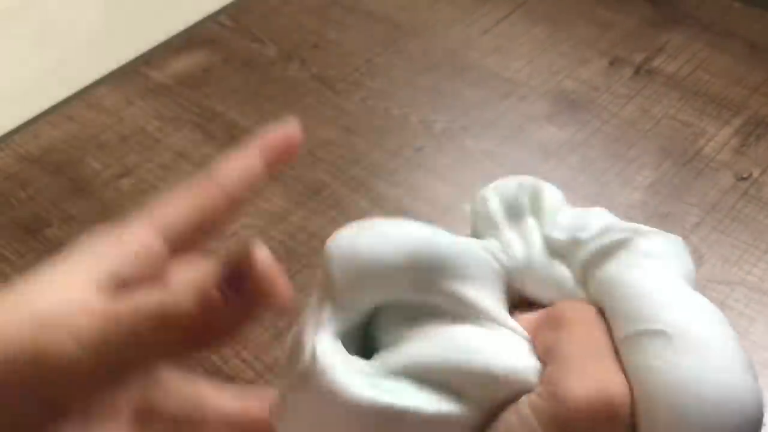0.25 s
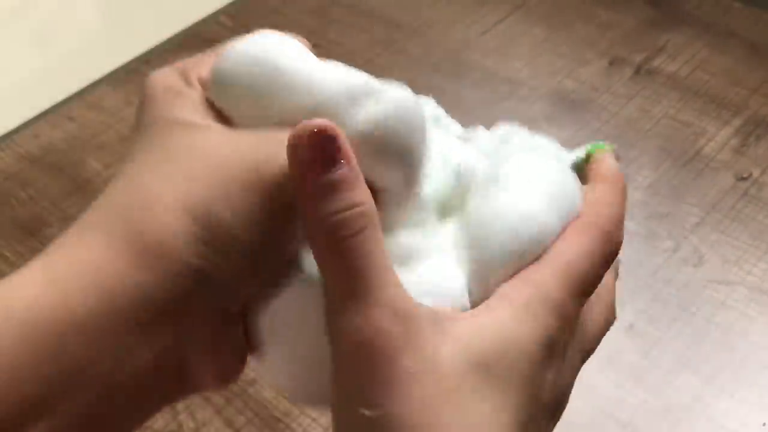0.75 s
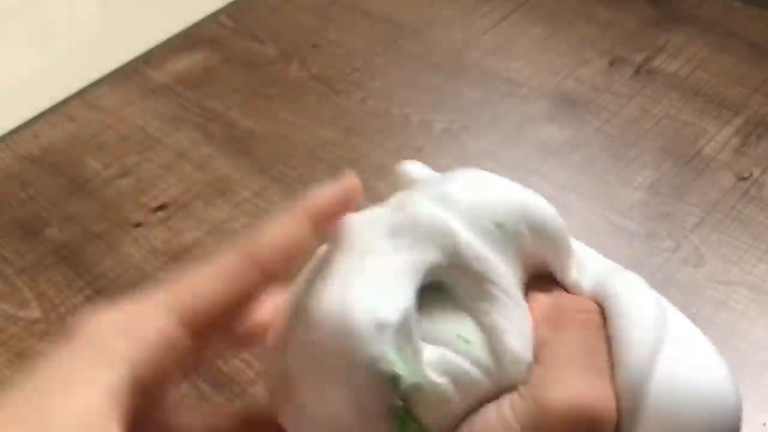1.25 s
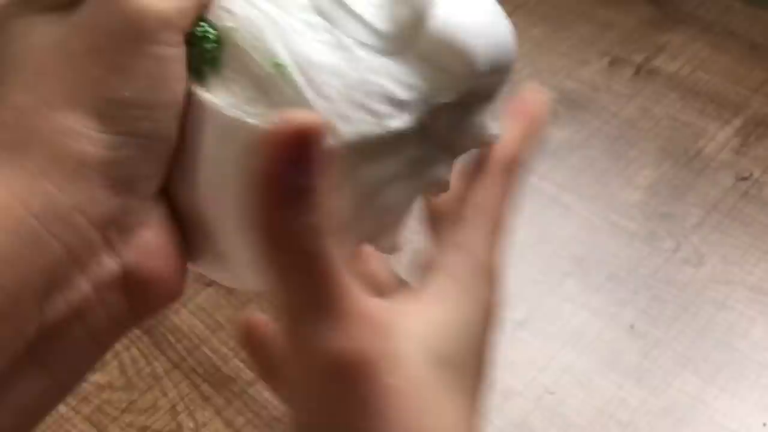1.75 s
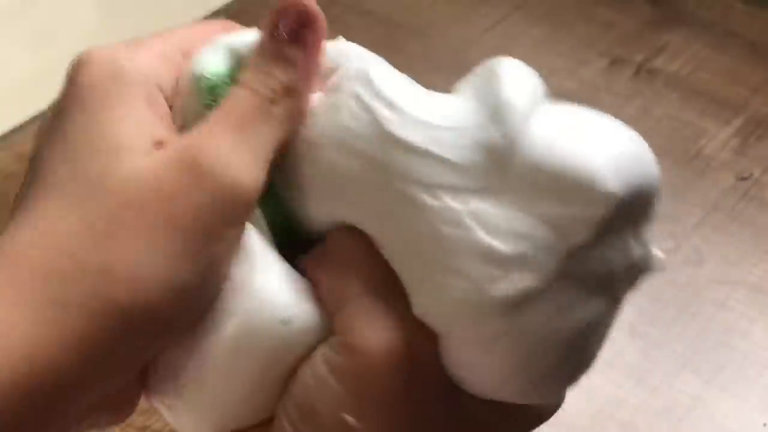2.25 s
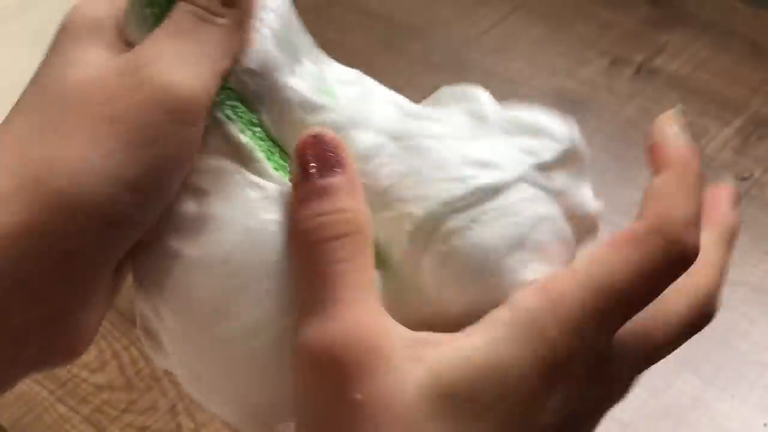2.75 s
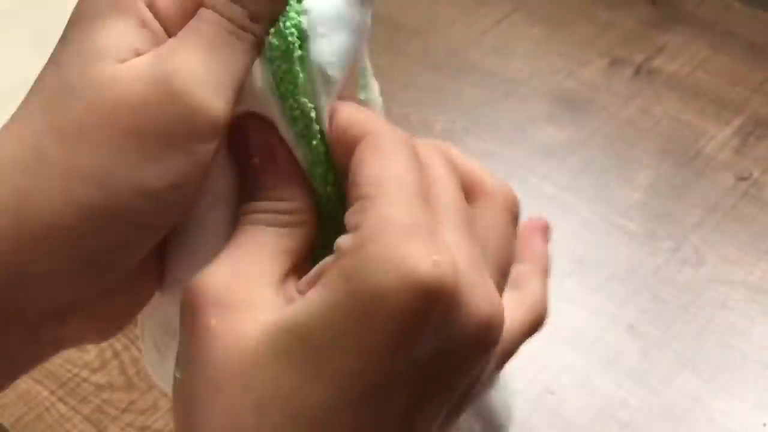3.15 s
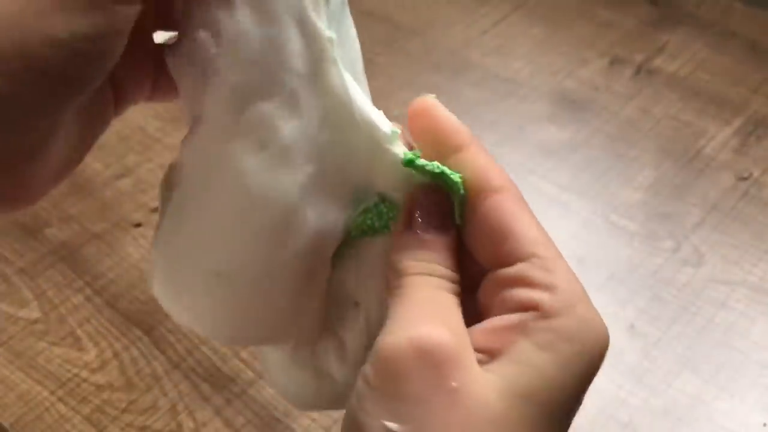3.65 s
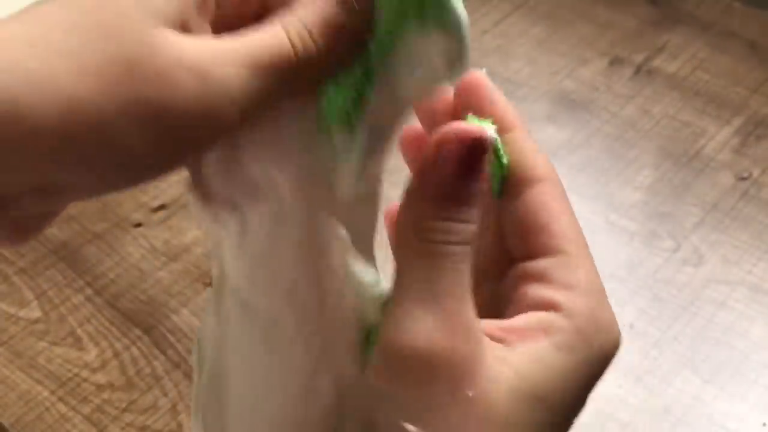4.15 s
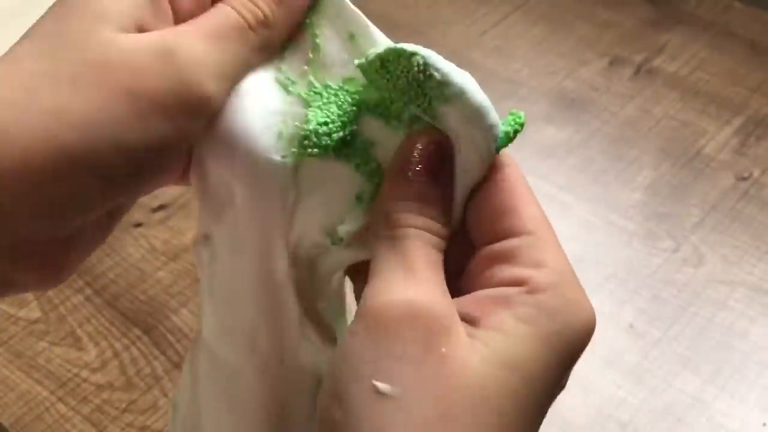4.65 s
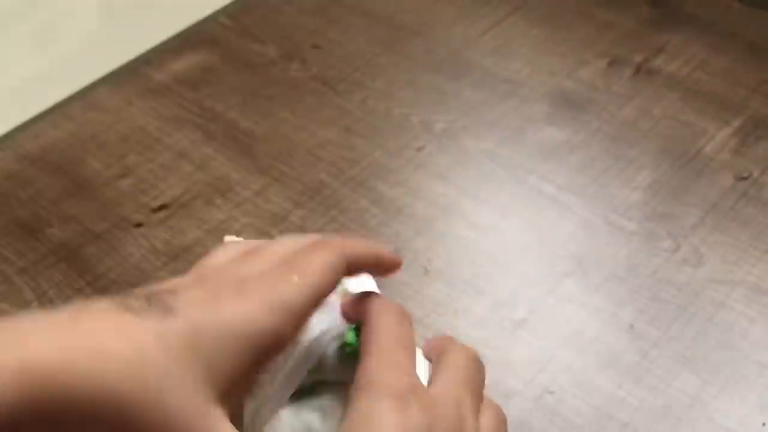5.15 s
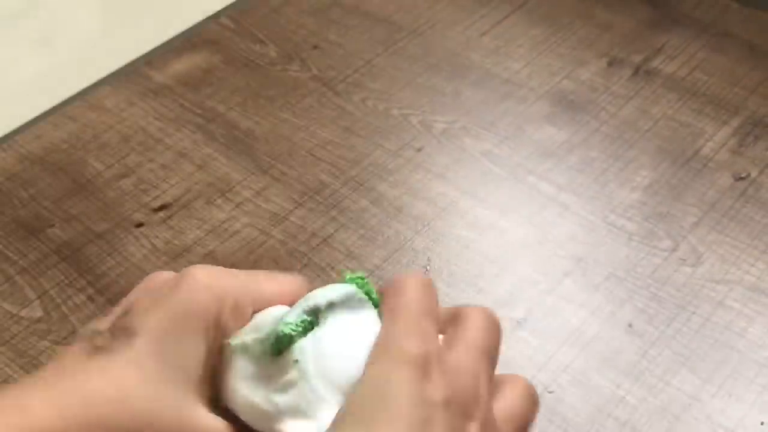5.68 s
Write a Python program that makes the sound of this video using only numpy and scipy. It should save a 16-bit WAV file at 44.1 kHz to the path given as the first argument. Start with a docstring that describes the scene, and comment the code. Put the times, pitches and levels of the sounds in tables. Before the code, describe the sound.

Squishy slime full of tiny bubbles is squeezed very near the microphone, indoors with a short dry echo. Irregular clicks, wet pops and bursts of crackle come in quick uneven groups, strongest at the start. Pulling the slime gives softer, continuous high fizzing and light ticks. A brief squeak, low plops, a sharp double snap and renewed crackling finish it. Weak hiss and low hum remain beneath.

```python
"""Hands knead soft slime close to a phone in a small quiet room; hiss and a wavering low hum run throughout.
It opens with loud film snaps, falling plops of collapsing air pockets and, at each squeeze, a dense crackle.
Halfway the lump is drawn into a sheet: a long rustle in the finest bubbles, under quieter snaps.
As the rustle ends a slit squeaks (noise in a moving resonance); more plops and two hard snaps close the scene.
Snaps and plops are short decaying swings; the crackle adds random ones over band-limited noise."""
import sys
import numpy as np
from scipy import signal
from scipy.fft import rfft, irfft
from scipy.io import wavfile

SR = 44100
rng = np.random.default_rng(int(sys.argv[2]) if len(sys.argv) > 2 else 0)


def transcribe(u):
    """Save the signal u as a 16-bit wav file named by the first command-line argument.

    u: samples, shape (n,) or (channels, n), limited to [-1, 1]; the rate is SR.
    q: integer samples, one column per channel.
    """
    v = np.clip(np.atleast_2d(u).T, -1, 1)
    q = np.round(v * 32767).astype(np.int16)
    wavfile.write(sys.argv[1], SR, q)


N = 261072

# Steady room and microphone noise, spectral shape: pitch_hz [Hz], density_db [dB per Hz, relative]
HISS_SHAPE = [(15, -45.5), (25, 21.5), (70, 14.5), (130, 19), (212, 15.5), (476, -20.5), (591, -24.5),
              (1190, 5), (13200, -54), (16000, 10.5)]
HISS_LEVEL_DB = -62.5  # rms
# Low hum in the room: start_s [s], level_db [dB rms]
HUM_LEVEL = [(0.0, -73), (1.2, -77), (1.34, -58.5), (1.98, -70), (2.37, -62), (2.49, -72.5), (3.12, -67),
             (3.13, -76), (3.71, -69.5), (3.84, -61.5), (4.01, -70.5), (4.78, -60.5), (4.83, -74.5),
             (5.01, -68.5), (5.04, -79.5), (5.36, -55.5), (5.44, -74), (5.92, -67.5)]
HUM_HZ, HUM_WIDTH_HZ = 79.43, 4.75
# Reverberation of the small room: pitch_hz [Hz], t60_s [s to fall 60 dB]
ROOM_DECAY = [(250, 0.195), (700, 0.204), (2000, 0.23), (5000, 0.129), (13000, 0.1615)]
ROOM_TAIL_DB = -12  # whole tail against the direct sound
# First reflections off table and hands: delay_s [s], level_db [dB]
NEAR_ECHOES = [(.0009, -28.5), (.0018, -24), (.0034, -28.5), (.0051, -26), (0.0105, -25.5)]
# Air squeezed through a closing slit: start_s [s], level_db [dB], pitch_hz [Hz]
SLIT_SQUEAK = [(4.92, -79.5, 1297), (4.945, -66.5, 1450), (5.0, -71.5, 1500), (5.02, -66.5, 1487),
               (5.03, -53.5, 1643), (5.04, -66, 2000), (5.05, -85, 2100)]
SQUEAK_WIDTH_HZ = 203
# Squeezes and pulls of the hands: hardest_grip_s [s], build_up_s [s], let_go_s [s],
# pockets_db [dB], bubbles_db [dB]
HAND_SQUEEZES = [(0, .05, 0.098, -54, -57), (0.171, 0.064, .1, -52.5, -52),
                 (.24, 0.088, 0.0691, -47, -50.5), (.49, 0.0425, 0.063, -60, -55),
                 (.55, 0.11, 0.143, -56.5, -53.5), (.75, 0.193, 0.162, -55, -56),
                 (1.0, 0.259, 0.168, -63.5, -60.5), (1.13, 0.047, 0.105, -62.5, -51.5),
                 (1.189, 0.0615, 0.1228, -47.5, -53), (1.6, 0.262, 0.229, -61, -58.5),
                 (1.708, 0.124, 0.0582, -49.5, -51), (1.864, 0.066, 0.0586, -61, -64),
                 (2.005, 0.098, 0.183, -60.5, -53), (2.133, 0.142, 0.056, -53, -55.5),
                 (2.359, 0.142, .04, -58.5, -57.5), (2.449, 0.072, 0.191, -57.5, -57),
                 (2.691, 0.0918, 0.0946, -49, -49), (2.906, 0.124, 0.0685, -54.5, -52.5),
                 (3.06, 0.102, .1, -68, -66), (3.239, 0.076, 0.143, -71.5, -63),
                 (3.49, 0.169, 0.136, -63, -58), (3.783, 0.13, 0.16, -71, -62),
                 (4.141, 0.101, 0.054, -70, -62.5), (4.44, 0.135, 0.238, -65.5, -62),
                 (4.675, 0.12, 0.251, -70.5, -62.5), (5.017, 0.19, 0.066, -69.5, -58),
                 (5.226, 0.032, 0.133, -66.5, -76.5), (5.446, 0.107, 0.099, -63.5, -59.5),
                 (5.515, 0.0616, 0.099, -57.5, -59.5), (5.737, 0.0351, 0.179, -50, -51.5),
                 (5.86, 0.15, 0.039, -51.5, -55)]
GRIP_FADE_DB, GRIP_CURVE = -15.5, 1.4  # level at the ends of build-up and let-go; roundness of the top
# How each bubble size follows a squeeze, largest first: share [0 = pockets_db, 1 = bubbles_db],
# offset_db [dB], rest_db [dB]
SIZE_FOLLOW = [(-0.21, -2, -71), (-0.0023, 1, -71.5), (0.8876, -0.74, -72.5), (0.9782, -0.3, -68)]
# Reverberant tails after plops (low noise) and snaps (treble noise): level against the burst, loss per second
LOW_TAIL_UNDER_DB, LOW_TAIL_FALL_DB_PER_S = -24, 150
TREBLE_TAIL_UNDER_DB, TREBLE_TAIL_FALL_DB_PER_S = -45.5, 190
# The long pull into a sheet
STRETCH_START_S, STRETCH_END_S, STRETCH_DB, STRETCH_EASE_S = 3, 5, -65.5, 0.02
# Bubble sizes in the crackle, largest first: lowest_hz [Hz], highest_hz [Hz],
# rate_per_s [bursts per s at a medium squeeze], spread_db [dB of size], smooth [squelch share of power, 0-1]
BUBBLE_SIZES = [(178.15, 432.7, 350, 3, 0.58), (600, 3247, 600, 6, 0.49), (3544, 8030, 500, 6.0, 0.39),
                (8060, 22150, 500, 6, 0.45)]
# Single bright film bursts: start_s [s], peak_db [dB], pitch_hz [Hz], swell [cycles, held to 0.2-6]
FILM_SNAPS = [(0.0665, -33, 6660, 0.48), (0.0812, -33, 4250, 0.63), (0.1101, -1, 9830, 0.349),
              (0.1153, -9.5, 8950, 0.18), (0.1359, -21.5, 7500, 0.4), (0.1988, -23, 5260, 0.72),
              (0.408, -30, 8970, 0.17), (0.4896, -27.5, 5300, 0.5), (0.5299, -24.5, 4740, 1),
              (0.715, -31.5, 5630, 0.5), (0.737, -28.5, 6000, 0.285), (1.0689, -21.5, 3720, 0.3),
              (1.118, -34.5, 10400, 0.57), (1.136, -29.5, 5000, 0.87), (1.1657, -24, 4930, 0.865),
              (1.1754, -16, 9300, 0.218), (1.348, -34, 3820, 0.64), (1.4683, -39.5, 11900, 0.82),
              (1.51, -16, 6140, 0.334), (1.803, -25.5, 8500, 0.265), (1.893, -35.5, 8300, 0.45),
              (1.9182, -23, 9710, 0.39), (1.9378, -34, 5260, 0.57), (1.9567, -35.5, 11100, 0.69),
              (2.0171, -30.5, 10100, 0.4), (2.0537, -33, 13200, 1.4), (2.2713, -38, 6600, 0.38),
              (2.3117, -18.5, 10300, 0.258), (2.3432, -15, 5450, 0.42), (2.3687, -25, 5960, 0.454),
              (2.3719, -23.5, 6900, 0.31), (2.4, -34, 5300, 0.75), (2.4362, -37, 5700, 0.89),
              (2.441, -34.5, 6000, 0.43), (2.4566, -24.5, 3460, 0.17), (2.4769, -31.5, 4800, 0.76),
              (2.4946, -37, 7300, 0.38), (2.5153, -34, 3560, 0.66), (2.6512, -16, 8300, 0.363),
              (2.6544, -12.5, 9230, 0.246), (2.663, -29, 9400, 0.77), (2.6895, -30, 6400, 0.38),
              (2.7792, -28.5, 9970, 0.448), (3.0678, -32, 11200, 0.75), (3.0906, -23, 10880, 0.394),
              (3.1245, -27, 10500, 0.395), (3.1497, -35.5, 6350, 0.52), (3.1764, -29, 10000, 0.358),
              (3.223, -33, 4230, 0.195), (3.2909, -32.5, 8000, 0.264), (3.3092, -30.5, 6500, 0.326),
              (3.3305, -33, 10300, 0.45), (3.4764, -35, 10400, 0.47), (3.484, -28, 12000, 0.81),
              (3.5438, -36, 9100, 0.47), (3.8456, -33.5, 6100, 0.25), (3.8856, -32.5, 10700, 0.56),
              (4.0976, -33.5, 6740, 0.33), (4.1625, -37.5, 13000, 1.5), (4.1928, -28.5, 7400, 0.434),
              (4.253, -37.5, 13440, 2.3), (4.2684, -35.5, 6560, 0.433), (4.3171, -32.5, 11700, 0.63),
              (4.4428, -37.5, 10360, 1.06), (4.613, -35, 7700, 0.385), (4.6224, -32, 13700, 1.36),
              (4.6477, -30, 11500, 0.347), (4.6737, -34, 10200, 0.54), (4.6942, -24, 12240, 0.73),
              (4.7474, -36.5, 9000, 0.67), (4.8542, -27, 10830, 0.337), (4.9124, -35, 9570, 0.66),
              (5.5039, -33.5, 10150, 0.8), (5.5166, -30, 12000, 0.74), (5.574, -5.5, 12100, 0.595),
              (5.5776, -6, 14200, 1.15), (5.5856, -21.5, 13300, 1.02), (5.8175, -22, 6000, 0.352)]
# Collapsing air pockets: start_s [s], tick_db [dB gain], tick_hz [nominal Hz],
# thump_db [dB gain], thump_hz [nominal Hz]
POCKET_PLOPS = [(0.082, -42, 1690, -46.5, 315), (0.1078, -19.5, 1096, -31.5, 286),
                (0.1095, -19.5, 798, -20, 332.6), (0.1175, -28.5, 1190, -28.5, 296.4),
                (0.1366, -28, 2060, -37, 296), (0.1443, -37.5, 1300, -35.5, 395),
                (0.1515, -34, 1120, -51.5, 300), (0.165, -36, 1330, -50.5, 270),
                (0.169, -39, 1800, -55, 303), (0.2292, -26, 2080, -50, 200.5),
                (0.2439, -31, 1626, -50.5, 318), (0.409, -46, 954, -45.5, 410),
                (0.491, -39.5, 1360, -43, 322), (0.5301, -32, 2500, -38, 366),
                (0.584, -34.5, 1320, -50.5, 352), (0.7152, -39, 1830, -49.5, 328),
                (0.7886, -49, 1720, -47, 423), (0.864, -41.5, 1040, -74.5, 370),
                (0.9409, -35.5, 1280, -57.5, 263), (0.969, -38.5, 2390, -56, 314),
                (1.069, -39, 1543, -53, 277), (1.136, -34, 1465, -40, 362),
                (1.165, -31.5, 1320, -42.5, 360), (1.1753, -33.5, 1750, -53, 427),
                (1.1886, -31, 1156, -63.5, 336), (1.234, -33.5, 1280, -41.5, 362),
                (1.511, -63.5, 1210, -44, 300), (1.7047, -32.5, 1780, -36, 354.6),
                (1.72, -31, 1357, -57, 332), (2.1224, -35, 1000, -41.5, 312.2),
                (2.1386, -36, 1210, -45.5, 313), (2.1882, -29.5, 1293, -62.5, 420),
                (2.2154, -23.5, 1287, -20, 316.4), (2.22, -29, 780, -30, 274),
                (2.3439, -32.5, 1383, -45, 323), (2.4147, -38, 1930, -61.5, 348),
                (2.4555, -25.5, 2466, -60, 305), (2.4563, -31, 757, -35, 320),
                (2.476, -28.5, 2010, -64, 310), (2.6152, -35.5, 1920, -40, 259.5),
                (2.6509, -35.5, 2250, -58, 350), (2.6657, -51.5, 1570, -43.5, 327),
                (2.7169, -29.5, 1990, -40, 374), (3.15, -43.5, 2090, -68, 190),
                (3.2232, -30.5, 1170, -42.5, 466), (3.2875, -43, 1660, -68.5, 390),
                (3.411, -37, 1190, -56.5, 378), (3.81, -78.5, 600, -54.5, 61),
                (4.1489, -46, 2370, -54.5, 356), (5.3004, -26, 1411, -27, 400),
                (5.308, -34, 926, -33.5, 255.7), (5.3162, -34.5, 1950, -36.5, 192.3),
                (5.4253, -42, 1440, -39.5, 294.4), (5.4369, -47.5, 2175, -42.5, 195.6),
                (5.499, -35.5, 1830, -44.5, 329), (5.575, -31, 2013, -51.5, 254),
                (5.7186, -36.5, 980, -43.5, 329), (5.7406, -28.5, 810, -36.5, 374.5),
                (5.753, -33, 1165, -45.5, 342), (5.7664, -31.5, 995, -57, 300),
                (5.7697, -29.5, 1308, -60.5, 300), (5.8316, -34, 880, -44, 402),
                (5.8415, -35, 910, -33, 401), (5.865, -35, 1020, -60.5, 350)]
MIC_EDGE_HZ = 15900


def gain_of(db):
    """Decibels to an amplitude factor."""
    return 10 ** (np.asarray(db) / 20)


def evened(x):
    """Scale to an rms of one."""
    return x / np.sqrt(np.mean(x ** 2) + 1e-20)


def read(points, hz):
    """Read a (pitch, value) curve along a logarithmic pitch axis."""
    f, value = np.transpose(points)
    return np.interp(np.log(hz + 1), np.log(f + 1), value)


def add(mix, s, sound):
    """Lay a sound into the mix from s seconds on."""
    part = mix[max(round(s * SR), 0):][:len(sound)]
    part += sound[:len(part)]


def band(x, lo_hz, hi_hz):
    """Keep one band of pitches, below 0.45 of the sample rate."""
    sos = signal.butter(2, [lo_hz, min(hi_hz, .45 * SR)], "bandpass", fs=SR, output="sos")
    return signal.sosfilt(sos, x)


def slow_noise(count, width_hz):
    """Complex noise that wanders slowly: turned up to a pitch, it is a resonance width_hz wide."""
    r = np.exp(-np.pi * width_hz / SR)
    noise = rng.standard_normal(count) + 1j * rng.standard_normal(count)
    return signal.lfilter([1 - r], [1, -r], noise)


def hiss():
    """Steady room and microphone noise: white noise shaped by a fixed spectrum."""
    hz = np.fft.rfftfreq(N, 1 / SR)
    spectrum = rfft(rng.standard_normal(N)) * gain_of(read(HISS_SHAPE, hz))
    return gain_of(HISS_LEVEL_DB) * evened(irfft(spectrum, N))


def hum():
    """A low hum that wavers: noise in one narrow resonance."""
    t = np.arange(N) / SR
    slow = slow_noise(N, HUM_WIDTH_HZ)
    # partly evened out, so the pitch wanders more than the level
    steady = slow / (abs(slow) + 0.23 * np.mean(abs(slow)))
    tone = (steady * np.exp(2j * np.pi * HUM_HZ * t)).real
    return gain_of(np.interp(t, *np.transpose(HUM_LEVEL))) * evened(tone)


def room(x):
    """A few near echoes and sparse taps of random sign, each band dying at its own speed."""
    taps = np.zeros(SR // 2)
    at = np.arange(60, len(taps) - 20, 20)
    taps[at + rng.integers(0, 20, len(at))] = rng.choice([-1., 1.], len(at))
    hz, t, z = signal.stft(taps, SR, nperseg=128)
    decay = gain_of(-60 * t / read(ROOM_DECAY, hz)[:, None])
    tail = signal.istft(z * decay, SR, nperseg=128)[1]
    tail = gain_of(ROOM_TAIL_DB) * tail / np.linalg.norm(tail)
    for s, db in NEAR_ECHOES:
        add(tail, s, gain_of([db]))
    return signal.fftconvolve(x, tail)[:N]


def squeak():
    """An airy whistle from a slit: a thin tone blurred by noise in one moving resonance."""
    s, db, hz = np.transpose(SLIT_SQUEAK)
    t, out = np.arange(s[0], s[-1], 1 / SR), np.zeros(N)
    slow = slow_noise(len(t), SQUEAK_WIDTH_HZ)
    turns = np.cumsum(np.interp(t, s, hz)) / SR
    whistle = ((slow + 0.52 * np.mean(abs(slow))) * np.exp(2j * np.pi * turns)).real
    add(out, s[0], gain_of(np.interp(t, s, db)) * evened(whistle))
    return out


def grip(t, share, offset_db, rest_db):
    """Power of one bubble size: every squeeze builds up and lets go by the same law, over a level at rest."""
    s, rise, fall, pockets_db, bubbles_db = np.transpose(HAND_SQUEEZES)[:, :, None]
    away = np.where(t < s, (s - t) / np.maximum(rise, .01), (t - s) / np.maximum(fall, .01))
    peak_db = pockets_db + share * (bubbles_db - pockets_db) + offset_db
    db = peak_db + GRIP_FADE_DB * away ** GRIP_CURVE
    return (gain_of(db) ** 2).sum(0) + gain_of(rest_db) ** 2


def burst_tail(t, s, burst_db, under_db, fall_db_per_s):
    """Power of the reverberant tail after each burst, dying away."""
    since = t - s[:, None]
    db = burst_db[:, None] + under_db - fall_db_per_s * abs(since)
    return (gain_of(db) ** 2 * (since > 0)).sum(0)


def size_levels():
    """Level curves of the four sizes: squeezes, reverberant tails (low after plops, treble after snaps), pull."""
    t = np.arange(0, N / SR + .01, .004)
    power = np.array([grip(t, *row) for row in SIZE_FOLLOW])
    plops, snaps = np.transpose(POCKET_PLOPS), np.transpose(FILM_SNAPS)
    power[0] += burst_tail(t, plops[0], plops[3], LOW_TAIL_UNDER_DB, LOW_TAIL_FALL_DB_PER_S)
    power[-1] += burst_tail(t, snaps[0], snaps[1], TREBLE_TAIL_UNDER_DB, TREBLE_TAIL_FALL_DB_PER_S)
    from_ends = np.minimum(t - STRETCH_START_S, STRETCH_END_S - t)
    power[-1] += gain_of(STRETCH_DB) ** 2 * np.clip(from_ends / STRETCH_EASE_S, 0, 1)
    return t, 10 * np.log10(power)


def falling(hz, drop, fall_cycles, peak_cycles, steep):
    """A swing whose pitch drops towards 0.78 of the nominal hz while it swells to a peak and dies."""
    u = np.arange(2048) / SR * hz
    pitch = 0.7804 + drop * np.exp(-u / max(fall_cycles, .05)) + 0.311 * np.exp(-u / 2.194)
    turns = np.cumsum(pitch) * hz / SR
    shape = (u / peak_cycles * np.exp(1 - u / peak_cycles)) ** steep
    return shape * np.sin(2 * np.pi * turns)


def tick(hz):
    """The mouth of a pocket tears open: a quick falling swing with a ragged flutter around the same pitch."""
    t = np.arange(2048) / SR
    flutter = evened(band(rng.standard_normal(len(t)), 0.444 * hz, 1.66 * hz))
    flutter = flutter * np.exp(-t / 0.00413) * np.minimum(t * hz, 1)
    return falling(hz, 0.651, 0.497, 0.93, 2.91) + 0.287 * flutter


def thump(hz):
    """The low part of a plop, delayed as by the phone's filtering: pitch slides down, a slower swing peaks later."""
    return -falling(hz, 2.623, 0.4078, 1.482, 3.3)


def snap(hz, cycles):
    """A film bursts: a sudden brief swing; the torn rim flaps back within 1.5 ms."""
    t = np.arange(128) / SR
    u = t * hz / np.clip(cycles, .2, 6)
    swing = np.sin(2 * np.pi * t * hz) * (u * np.exp(1 - u)) ** 2.17
    flaps = 0.279 * rng.standard_normal(64) * (rng.random(64) < .2)
    flaps *= np.exp(-np.arange(64) / SR / 0.001255)
    flaps[0] = 1  # the burst itself
    sound = np.convolve(swing, flaps)
    return sound / abs(sound).max()


def small_bubble(hz):
    """A small bubble collapses: one short falling swing."""
    return falling(hz, 0.398, 0.623, 1.208, 1.66)


def crackle():
    """Random bursts of four bubble sizes, bunched in time, over the wet squelch of the same band."""
    s, levels_db = size_levels()
    t, out = np.arange(N) / SR, np.zeros(N)
    bunch = gain_of(2.334 * evened(band(rng.standard_normal(N), 20.4, 101.5)))
    grains = thump, small_bubble, lambda hz: snap(hz, 0.965), lambda hz: snap(hz, 0.524)
    chance, excess = rng.random(N), np.minimum(rng.exponential(1, N), 3.2)
    for level_db, grain, row in zip(levels_db, grains, BUBBLE_SIZES):
        lo_hz, hi_hz, per_s, spread_db, smooth = row
        lag = 0 if lo_hz > 3500 else rng.integers(N)  # the two finest sizes burst together
        db = np.interp(t, s, level_db)
        crowd = gain_of(.9 * (db + 58.5))  # a harder squeeze bursts more bubbles, and somewhat louder ones
        bursting = np.roll(chance, lag) < crowd * per_s / SR
        size = gain_of(spread_db * np.roll(excess, lag)) * bursting / np.sqrt(crowd)
        kind, pops = rng.integers(0, 10, N), np.zeros(N)
        for k, hz in enumerate(np.geomspace(lo_hz, hi_hz, 10)):
            shape = grain(hz)
            pops += signal.oaconvolve(size * (kind == k), shape / np.linalg.norm(shape))[:N]
        squelch = band(rng.standard_normal(N), lo_hz, hi_hz)
        share = np.clip(smooth, 0, 1)
        both = np.sqrt(1 - share) * evened(pops) + np.sqrt(share) * evened(squelch)
        out += gain_of(db) * evened(both * bunch)
    return out


def bursts():
    """The single film snaps and pocket plops that stand out; a plop is a tick and a thump together."""
    out = np.zeros(N)
    for s, db, hz, cycles in FILM_SNAPS:
        add(out, s, gain_of(db) * snap(hz, cycles))
    for s, tick_db, tick_hz, thump_db, thump_hz in POCKET_PLOPS:
        add(out, s, gain_of(tick_db) * tick(tick_hz) + gain_of(thump_db) * thump(thump_hz))
    return out


def scene():
    """The slime close by, its sound in the small room, and the hum and hiss behind it."""
    slime = bursts() + crackle() + squeak()
    return (slime + room(slime) + hum() + hiss())[None]


def record(dry):
    """The microphone's bass cut, then the band limit."""
    cut = signal.sosfilt(signal.butter(2, 40, "highpass", fs=SR, output="sos"), dry)
    low_pass = signal.firwin(511, MIC_EDGE_HZ, window=("kaiser", 9), fs=SR)
    return signal.oaconvolve(cut, low_pass[None], "same")


dry = scene()
out = record(dry)
transcribe(out)
```